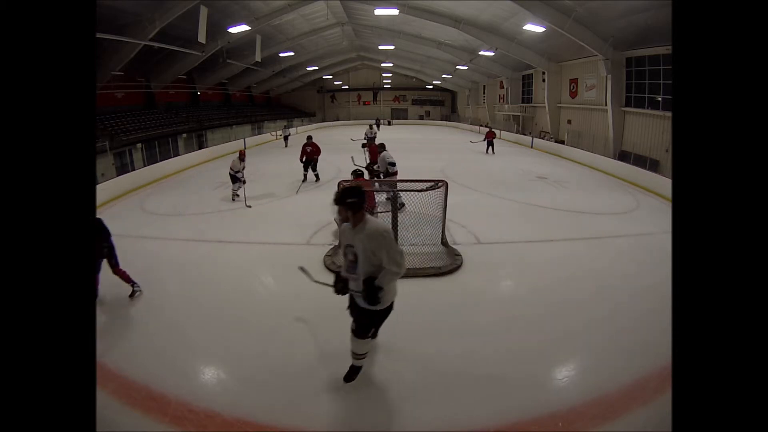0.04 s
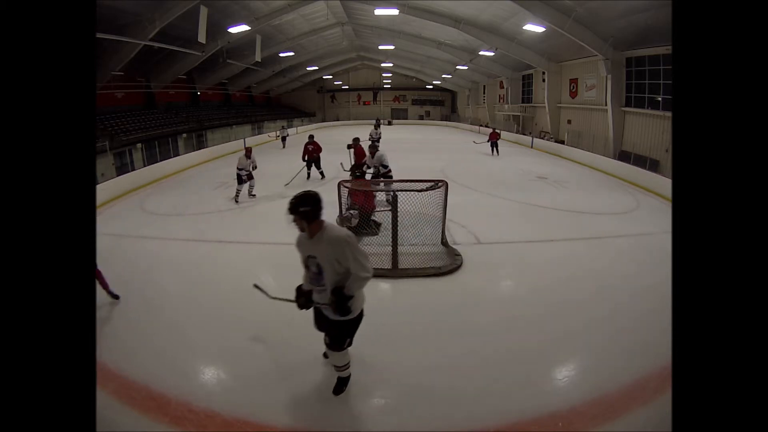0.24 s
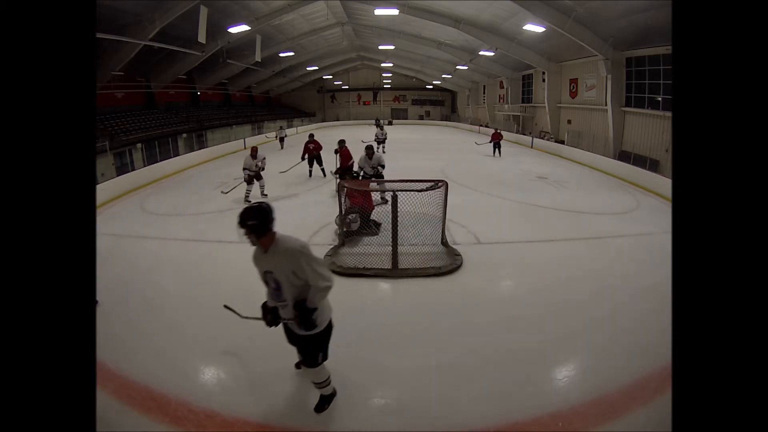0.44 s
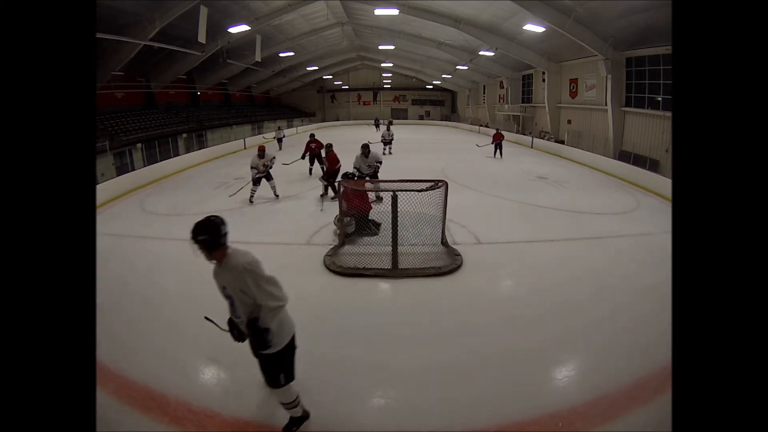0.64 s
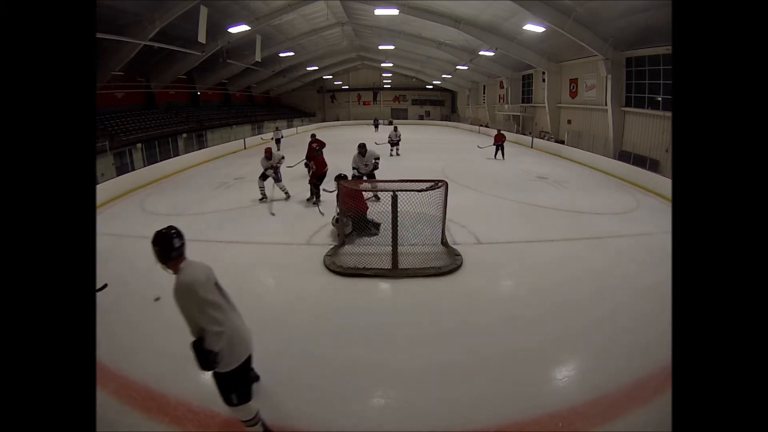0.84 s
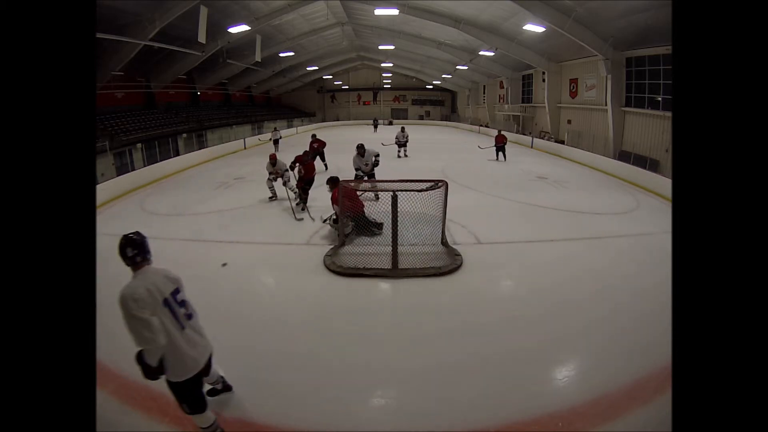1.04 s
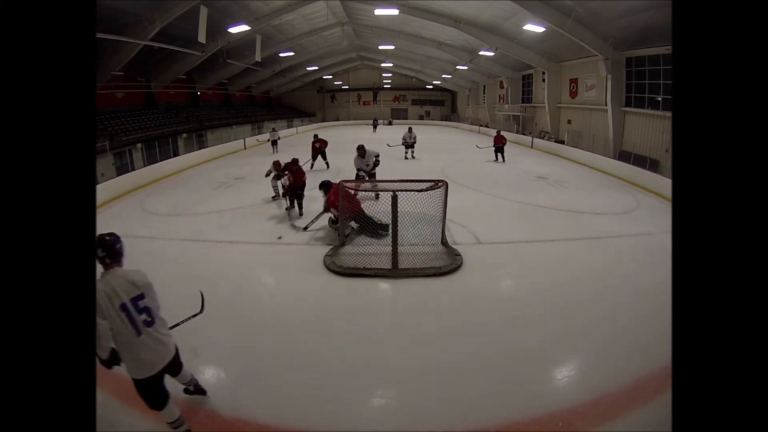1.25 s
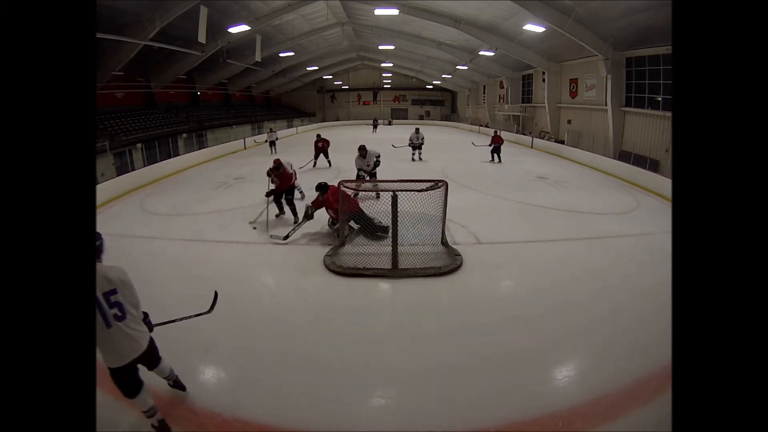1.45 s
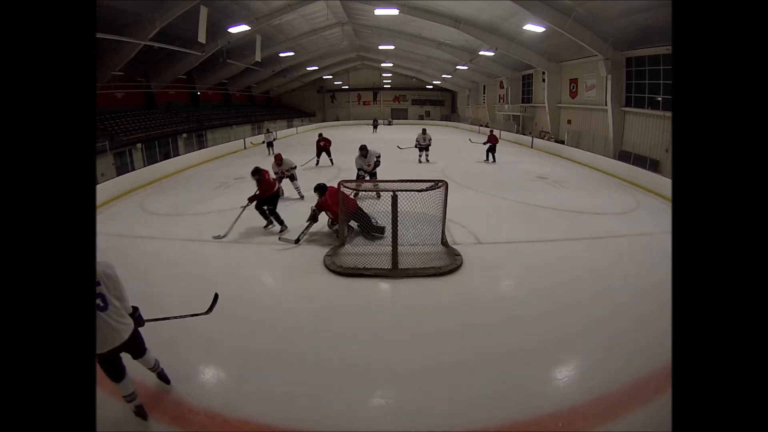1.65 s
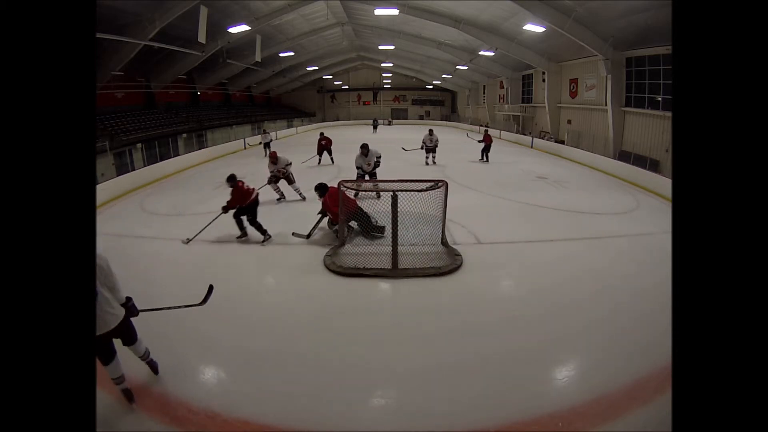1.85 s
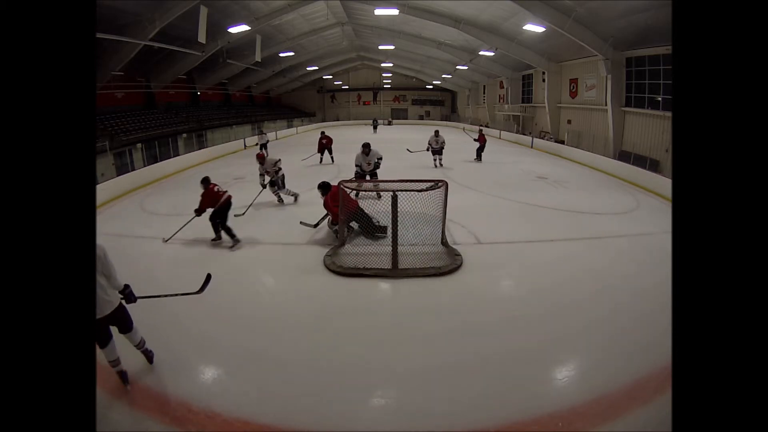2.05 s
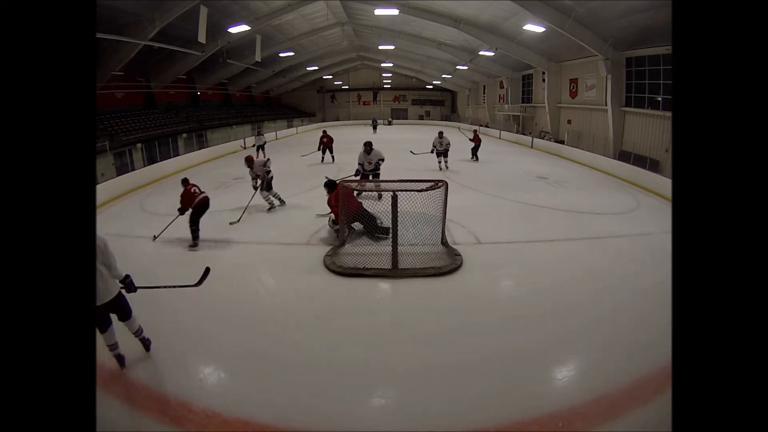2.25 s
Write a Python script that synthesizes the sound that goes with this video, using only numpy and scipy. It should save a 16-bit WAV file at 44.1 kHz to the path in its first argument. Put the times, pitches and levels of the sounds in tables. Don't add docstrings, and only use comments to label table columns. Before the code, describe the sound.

Hockey play on indoor ice: one hard shot, scattered stick knocks, grainy skate scrapes, low hum

```python
import sys
import numpy as np
from scipy import signal
from scipy.io import wavfile

SR = 44100
rng = np.random.default_rng(int(sys.argv[2]) if len(sys.argv) > 2 else 0)


def linear_from_db(decibels):
    return 10 ** (np.asarray(decibels, float) / 20)


def wav_out(sig):
    wavfile.write(sys.argv[1], SR, np.round(np.clip(np.atleast_2d(sig).T, -1, 1) * 32767).astype(np.int16))


N = 99225

# pitch in Hz, level in dB per Hz.
PLANT_COLOUR = [(25, -9), (50, -3.5), (100, -10.5), (200, -5.5), (260, -15.5), (310, -10.5), (500, -38.5),
                (900, -22.5)]
# pitch in Hz, width in Hz, level in dB.
HUM_TONES = [(78.7, 11, -57.5), (248.7, 3.4, -57.5), (205.3, 29.4, -55), (151.6, 27, -72),
             (122.5, 8.2, -65.5)]
# time in seconds, level in dB.
SKATER_WEIGHT = [(0, 4.5), (.2, -1), (.45, 3.5), (.7, 0.5), (.9, -3), (1.0, 3), (1.2, 3), (1.3, -5),
                 (1.4, 3.5), (1.7, -1.5), (1.9, 7), (2.05, 2.5), (2.25, 2)]
# time in seconds, pitch in Hz, level in dB.
DRONE_PATH = [(0, 227.7, -62), (.2, 229.9, -51), (0.247, 217.3, -25.5), (0.298, 221.7, -38),
              (0.348, 222, -42), (.55, 238.3, -55.5), (0.661, 230.2, -45), (.9, 227.1, -59),
              (1.098, 218.2, -46.5), (1.26, 202, -54), (1.41, 230.2, -50.5), (1.55, 214, -59),
              (1.9, 215, -74), (2.25, 226.4, -64)]
# time in seconds, level in dB, brightness in dB.
CARVE_EFFORT = [(0, -46.5, -4.5), (0.199, -47.5, -1.5), (.4, -49.5, 3.5), (.6, -44.5, -4), (.85, -47, 1),
                (.97, -48.5, 4), (1.15, -49, 5.5), (1.351, -49.5, 5), (1.5, -43.5, 2.5), (1.62, -52.5, 6.5),
                (1.78, -45.5, -4.5), (1.949, -46, -1.5), (2.1, -47.5, 0), (2.25, -45.5, -3)]
# pitch in Hz, level in dB per Hz.
CARVE_COLOUR = [(400, -11), (1100, -10.5), (1450, 1.5), (2450, 3), (3000, -8), (5600, -11.5), (7600, -20),
                (15000, -27.5)]
# start in seconds, length in seconds, share of it spent rising.
BITES = [
    (.34, .3, .45),
    (1.445, .3, .03),
    (1.97, .07, .08),
    (2.18, .09, .1),
    (.3, .57, .4),
    (.95, .55, .3),
    (1.818, .028, .1),
    (1.88, .5, .3),
    (1.47, .27, .2),
    (0, .4, .01),
]
# level in dB, pitch in Hz, width in Hz.
BITE_HISS = [(-56.5, 10130, 1700), (-47.5, 2195, 310), (-50.5, 5650, 840), (-58, 6600, 1800),
             (-57, 3700, 1100), (-59, 4700, 1800), (-45, 1760, 1250), (-67, 10300, 1700), (-58, 1010, 380),
             (-62, 5500, 6700)]
# time in seconds, level in dB.
BOOMS = [
    (.226, -30.5),
    (.237, -33),
    (0.271, -33.5),
]
# pitch in Hz, level in dB, seconds to fall by 60 dB.
BOARD_MODES = [(63.9, -13, 0.94), (177, -14.5, 0.48), (305, 0.5, 0.15), (352.5, -8.5, 0.18),
               (420, -3.5, 0.17), (580, -2, 0.03), (800, -3, 0.018), (1073, -10, 0.024)]
# start in seconds, peak in dB, pitch in Hz, swell time in seconds.
SKIP_TONES = [(.2142, -26, 1481, 0.002), (.219, -17, 2445, 0.002), (.2208, -17.5, 1580, 0.0015),
              (.2295, -25.5, 1500, 0.0023), (.6493, -26, 2020, 0.00099), (0.59, -36, 650, 0.0009),
              (1.4275, -33, 800, 0.0013), (1.101, -32, 1162, 0.0012), (1.1012, -42.5, 480, 0.0011),
              (.2222, -24, 1043, 0.00073), (.2225, -34, 646, 0.0016), (.238, -35, 756, 0.0027),
              (.253, -37.5, 990, 0.0026), (.2222, -21.5, 2120, 0.00054), (.212, -43, 3100, 0.004),
              (.2305, -31.5, 2700, 0.0015), (.2235, -23, 1900, 0.0014), (1.4445, -34, 2050, 0.0018),
              (1.455, -32, 2100, 0.0017), (1.4895, -37, 2200, 0.0019), (1.1, -51, 12000, 0.0012),
              (1.1025, -46, 10100, 0.00099), (1.1010, -39, 7100, 0.00055), (1.1030, -26, 1970, 0.0014),
              (1.4305, -24, 2350, 0.0013), (1.4755, -31, 2160, .002), (1.503, -37, 2300, 0.0018),
              (1.5316, -41, 2300, 0.0014), (1.5535, -36.5, 2240, 0.004), (1.572, -30, 2400, 0.0012),
              (1.585, -42, 2260, 0.0012), (1.6069, -39, 2250, 0.0015), (1.625, -34.5, 2060, 0.0025),
              (1.667, -42, 2400, 0.0024), (1.6935, -42, 2200, 0.0024), (1.705, -40, 2250, 0.0023),
              (1.8, -36, 2100, 0.0013), (1.8195, -36, 2020, 0.0014), (1.827, -37, 2070, .002),
              (1.84, -36, 2140, 0.0012), (1.978, -37, 2100, 0.0018), (1.9903, -29, 1570, 0.0012),
              (2.033, -39, 1950, 0.00088), (.276, -34, 2300, 0.0014), (.289, -34.5, 2400, .003)]
# start in seconds,
# peak in dB, pitch in Hz, width in octaves, ring in seconds.
CLACKS = [(0.6478, -19.5, 1510, 1.8, .0045), (0.994, -27.5, 1900, 0.92, 0.067),
          (1.088, -28.5, 2290, 0.61, 0.075), (1.0945, -30, 1930, 0.5, 0.027),
          (1.101, -20.5, 1800, 1.03, 0.024), (1.4272, -18, 1910, 1.7, 0.017),
          (1.4362, -21, 1870, 0.86, 0.048), (1.4418, -24, 2130, 1.6, 0.049),
          (1.4737, -26, 1940, 0.28, 0.015), (1.505, -52, 2300, 0.45, .05),
          (1.573, -42, 2260, 0.43, 0.031), (1.6295, -35, 2000, 0.32, 0.06),
          (1.700, -52, 2168, 0.13, 0.054), (1.836, -29, 1680, 0.8, 0.011),
          (1.9902, -31, 1700, 1.5, 0.023), (2.1953, -27.5, 1700, 1.07, 0.038),
          (0.223, -29.5, 3950, 0.6, .05), (0.806, -35.5, 5005, 0.67, 0.028),
               (0.991, -29, 3950, 0.92, 0.063), (1.036, -37, 5940, 0.83, 0.026),
               (1.051, -30, 3870, 0.96, 0.027), (1.101, -18.5, 4660, 0.54, 0.019),
               (1.159, -34.5, 4547, 1.5, .03), (1.183, -31, 3030, 0.78, 0.023),
               (1.300, -32.5, 5550, 0.84, 0.024), (1.428, -36, 4400, 1.2, 0.03),
               (1.442, -32, 5450, 0.23, 0.02), (1.832, -43, 5600, 0.39, 0.017),
               (1.889, -44, 6160, 0.54, 0.017), (1.990, -33, 3900, 1, 0.022),
               (2.085, -39.5, 4160, 0.74, 0.045), (2.119, -41, 5900, 0.27, 0.017),
               (2.137, -39, 3496, 0.57, 0.071), (2.169, -37, 5300, 0.4, 0.019),
               (2.159, -38.5, 6300, 0.62, 0.024), (1.937, -46, 5000, 1.3, 0.035)]
# pitch in Hz, level in dB, seconds to fall by 60 dB.
STICK_MODES = [(727, -19, 0.024), (1030, -10, 0.013), (1320, -11, 0.014), (1456, -13.5, 0.069),
               (1716, -7, 0.023), (1843, -6.5, 0.058), (1930, -0.5, 0.016), (2102, -7.5, 0.051),
               (2380, -5, 0.0065), (2530, -10, 0.0073), (2640, -6, 0.024), (2955, -3.5, 0.0097)]
# pitch in Hz, width in Hz, level in dB.
HOUSING_TONES = [(1480, 89, -4.5), (2030, 185, -54), (3444, 184, 2)]

PLANT_DB = -54.5
CHIPS_PER_S, CHIP_SPREAD_DB, CHIP_SHARE = 2500, -0.5, 0.46
BRIGHT_FROM_HZ = 2160
EDGE_FADE, EDGE_FLUTTER_DB = 0.2, 2.5
CLICK_DB = 17
SOFT_ABOVE = 1.97
SHOT_S, SHOT_DB = 0.222, -19.5
DRAG_S, DRAG_DB = 0.016, -39
RATTLE_S, RATTLE_DB = 0.024, -26
HALL_T60_S, HALL_DB, HALL_RISE_S, HALL_CUT_HZ = 1.7, -10.5, 0.0011, 2500
HALL_LOW_HZ, HALL_LOW_DB = 1370, -10
FAR_WALL_S, FAR_WALL_SMEAR_S, FAR_WALL_DB = 0.066, 0.016, -25.5
SKIP_HALL_DB = -4
PORT_HZ, PORT_DB = 7750, -5.5
LOW_CUT_HZ, CUTOFF_HZ = 70, 15200


def rms_one(x):
    return x / np.sqrt(np.mean(x ** 2) + 1e-20)


def drift(rate):
    r = np.exp(-80 * np.pi * rate / SR)
    slow = signal.lfilter([1], [1, -2 * r, r * r], rng.standard_normal(N // 40 + 2002))[2000:]
    return np.interp(np.arange(N) / 40, np.arange(len(slow)), rms_one(slow))


def ring(x, hz, t60):
    r = linear_from_db(-60 / (t60 * SR))
    w = 2 * np.pi * hz / SR
    return signal.lfilter([0, np.sin(w)], [1, -2 * r * np.cos(w), r * r], x + 1e-18)


def low_pass(x, hz):
    return signal.sosfilt(signal.butter(2, hz, fs=SR, output="sos"), x)


def high_pass(x, hz):
    return signal.sosfilt(signal.butter(2, hz, "high", fs=SR, output="sos"), x)


def band_pass(x, low_hz, high_hz):
    high_hz = min(high_hz, 0.45 * SR)
    return signal.sosfilt(signal.butter(2, [low_hz, high_hz], "band", fs=SR, output="sos"), x)


def banded(sources, colour, patchy_db, extra_db=lambda hz: 0):
    f, db = np.transpose(colour)
    borders = f[0] * 2 ** np.arange(0, np.log2(f[-1] / f[0]) + 0.3, 1 / 3)
    out = 0
    for k, (low, high) in enumerate(zip(borders, borders[1:])):
        hz = np.sqrt(low * high)
        sos = signal.butter(2, [low, high], "band", fs=SR, output="sos")
        part = signal.sosfilt(sos, sources[k % 2])
        level_db = np.interp(np.log(hz), np.log(f), db) + patchy_db * drift(5.1) + extra_db(hz)
        out = out + part * linear_from_db(level_db)
    return out


def plant():
    out = linear_from_db(PLANT_DB) * rms_one(banded(rng.standard_normal((2, N)), PLANT_COLOUR, patchy_db=1.0))
    for hz, width, db in HUM_TONES:
        t60 = np.log(1000) / np.pi / width / 1.72
        once = ring(rng.standard_normal(N + SR), hz, t60)
        tone = ring(once, hz, t60)[SR:]
        out = out + linear_from_db(db) * rms_one(tone)
    return out * linear_from_db(np.interp(np.arange(N) / SR, *np.transpose(SKATER_WEIGHT)))


def drone():
    s, hz, db = np.transpose(DRONE_PATH)
    t = np.arange(N) / SR
    pitch = np.interp(t, s, hz) + 4.55 * drift(8.6)
    level = linear_from_db(np.interp(t, s, db) + 4.8 * drift(13.0))
    return np.sqrt(2) * level * np.sin(2 * np.pi * np.cumsum(pitch) / SR)


def carving():
    s, db, bright = np.transpose(CARVE_EFFORT)
    t = np.arange(N) / SR
    db, bright = np.interp(t, s, db), np.interp(t, s, bright)
    noise = rng.standard_normal((2, N))
    size = linear_from_db(CHIP_SPREAD_DB * np.minimum(rng.exponential(1, (2, N)), 4))
    chips = size * (rng.random((2, N)) < CHIPS_PER_S / SR) * np.sign(noise)
    mix = CHIP_SHARE * rms_one(chips) + (1 - CHIP_SHARE) * noise

    def lift(hz):
        share = np.clip(np.log2(hz / BRIGHT_FROM_HZ) + 0.5, 0, 1)
        return bright * share * (0.4 if hz > 8500 else 1)

    return linear_from_db(db + 12 + 0.61 * drift(46)) * banded(mix, CARVE_COLOUR, patchy_db=1.41, extra_db=lift)


def edges():
    out = np.zeros(N + SR)
    for (s, length, rise), (db, hz, width) in zip(BITES, BITE_HISS):
        u = np.arange(int(length * SR)) / (length * SR)
        shape = np.minimum(u / rise, 1) * (1 - u) ** EDGE_FADE
        hiss = rms_one(band_pass(rng.standard_normal(N), hz - width / 2, hz + width / 2))
        hiss = hiss * linear_from_db(db + EDGE_FLUTTER_DB * drift(43))
        out[int(s * SR):][:len(u)] += shape * hiss[2000:][:len(u)]
    return out[:N]


def boards():
    out = 0
    for hz, db, t60 in BOARD_MODES:
        push = np.zeros(N)
        for s, boom_db in BOOMS:
            push[int(s * SR)] = linear_from_db(boom_db + db + rng.normal(0, 3.5))
        out = out + ring(push, hz, t60)
    return signal.lfilter([0.12], [1, -0.88], out)


def skips():
    out = np.zeros(N + SR)
    t = np.arange(SR // 20) / SR
    for s, db, hz, swell in SKIP_TONES:
        shape = t / swell * np.exp(1 - t / swell)
        out[int(s * SR):][:len(t)] += linear_from_db(db) * shape * np.sin(2 * np.pi * hz * t)
    return out[:N]


def clacks():
    out = np.zeros(N + SR)
    t = np.arange(SR // 8) / SR
    for s, db, hz, octaves, t60 in CLACKS:
        splinters = rng.standard_normal(len(t)) * linear_from_db(-60 * t / t60)
        contact = splinters + linear_from_db(CLICK_DB) * (t == 0)
        body = band_pass(contact, hz * 2 ** (-octaves / 2), hz * 2 ** (octaves / 2))
        body = low_pass(body, min(SOFT_ABOVE * hz, 0.45 * SR))
        out[int(s * SR):][:len(t)] += linear_from_db(db) * body / np.abs(body).max()
    return out[:N]


def shot():
    t = np.arange(N) / SR - SHOT_S
    drag = linear_from_db(DRAG_DB) * (t > -DRAG_S) * np.exp(-np.abs(t) / np.where(t < 0, 0.005, 0.003))
    rattle = linear_from_db(RATTLE_DB) * (t > 0) * np.exp(-np.abs(t) / RATTLE_S)
    strike = np.arange(N) == int(SHOT_S * SR)
    force = (drag + rattle) * rng.standard_normal(N) - strike
    out = 0
    for k, (hz, db, t60) in enumerate(STICK_MODES):
        out = out + linear_from_db(db) * (-1) ** k * ring(force, hz, t60)
    return linear_from_db(SHOT_DB) * out


def hall(x):
    t = np.arange(N) / SR
    noise = rng.standard_normal(N)
    low = low_pass(noise, HALL_CUT_HZ)
    high = noise - low
    tail = low * linear_from_db(-60 * t / HALL_T60_S) + high * linear_from_db(-60 * t / (HALL_T60_S * 0.18))
    tail = tail * (1 - np.exp(-t / HALL_RISE_S))
    tail = linear_from_db(HALL_LOW_DB) * tail + high_pass(tail, HALL_LOW_HZ)
    echo = low * np.exp(-((t - FAR_WALL_S) / FAR_WALL_SMEAR_S) ** 2)
    reply = linear_from_db(HALL_DB) * tail / np.linalg.norm(tail) + linear_from_db(FAR_WALL_DB) * echo / np.linalg.norm(echo)
    return signal.fftconvolve(x, reply)[:N]


def scene():
    background = plant() + drone()
    skating = carving() + edges()
    puck_skips = skips()
    blows = boards() + clacks() + shot()
    reply = hall(blows + linear_from_db(SKIP_HALL_DB) * puck_skips)
    return (background + skating + puck_skips + blows + reply)[None]


def top_cut(x):
    return signal.sosfilt(signal.butter(12, 15360, fs=SR, output="sos"), x)


def record(dry):
    x = dry
    for hz, width, db in HOUSING_TONES:
        x = x + linear_from_db(db) * signal.lfilter(*signal.iirpeak(hz, hz / width, fs=SR), dry)
    below_port = signal.sosfiltfilt(signal.butter(8, PORT_HZ, fs=SR, output="sos"), x)
    x = linear_from_db(PORT_DB) * x + (1 - linear_from_db(PORT_DB)) * below_port
    x = high_pass(x, LOW_CUT_HZ)
    x = signal.sosfilt(signal.ellip(12, 0.5, 60, CUTOFF_HZ, fs=SR, output="sos"), x)
    return top_cut(x)


dry = scene()
out = record(dry)
wav_out(out)
```